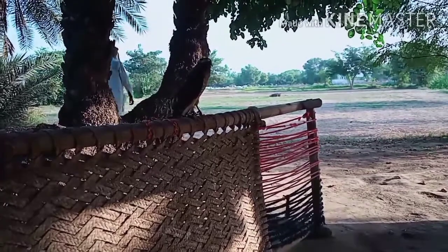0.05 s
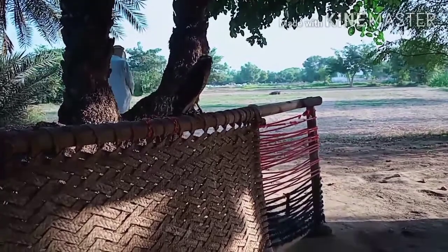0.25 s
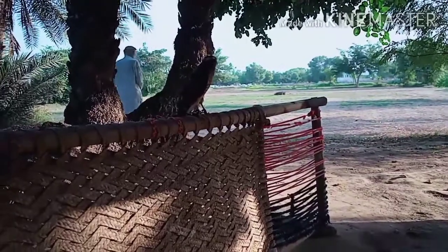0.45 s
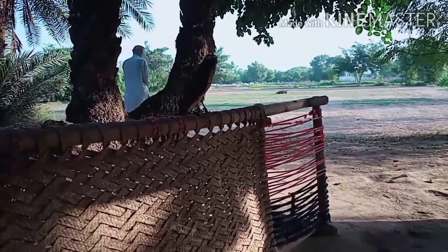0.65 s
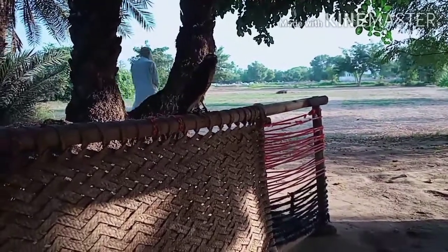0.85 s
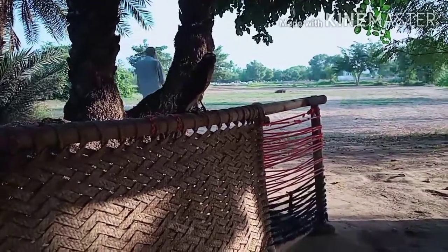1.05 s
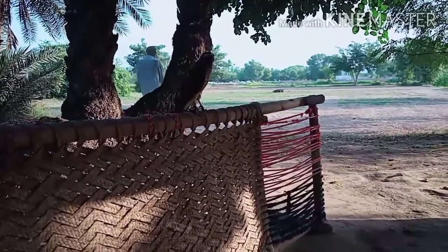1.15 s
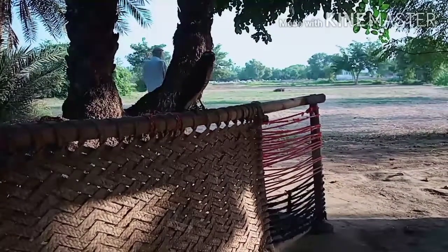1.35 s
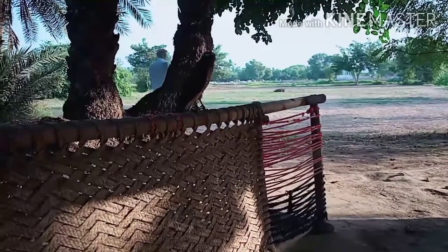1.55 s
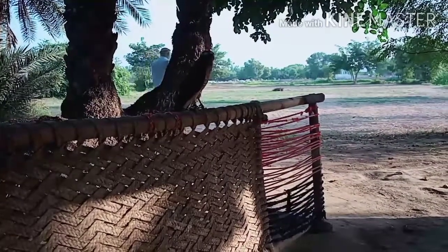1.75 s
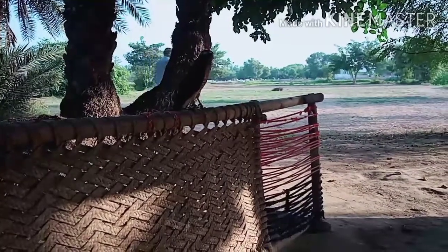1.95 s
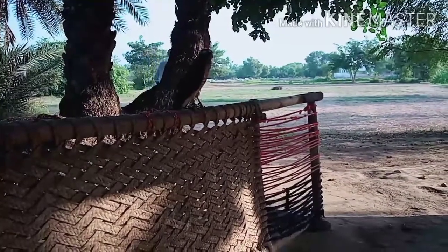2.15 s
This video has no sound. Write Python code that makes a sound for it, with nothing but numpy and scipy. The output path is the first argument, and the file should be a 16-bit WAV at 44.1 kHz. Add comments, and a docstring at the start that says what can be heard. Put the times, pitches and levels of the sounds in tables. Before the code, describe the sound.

One drawn-out bird-of-prey cry rises and falls outdoors, followed by a crisp click and tiny jingles.

```python
"""Hawk calling in a rural yard

A perched hawk gives one long clear wail, a stack of pure tones; trunks and walls echo it, so its overtones beat.
A dry snap rings short tones and leaves a noisy tail; two tiny bells jingle as knocks and rattle ring their metal.
Small birds chirp with gliding tones, and a faint low swell of filtered noise passes.
A far one-cylinder pump thumps with low ringing tones, over coloured noise for hum, leaves and far birds."""
import sys
import numpy as np
from scipy import signal
from scipy.fft import rfft, irfft
from scipy.io import wavfile
from scipy.ndimage import uniform_filter1d

SR = 44100
rng = np.random.default_rng(int(sys.argv[2]) if len(sys.argv) > 2 else 0)


def voltage_ratio(level):
    """Linear amplitude factor for a level in decibels (scalar or array-like)."""
    return 10 ** (np.asarray(level, float) / 20)


def master_out(mix):
    """Clip the mix to full scale and print it as 16-bit PCM to the path in sys.argv[1]."""
    frames = np.transpose(np.atleast_2d(mix))
    ceiling = np.clip(frames, -1, 1)
    pcm = np.round(ceiling * 32767).astype(np.int16)
    wavfile.write(sys.argv[1], SR, pcm)


N = 97020
T = np.arange(N) / SR  # time of each sample [s]


def curve(rows, col, outside=None):
    """A table column joined by straight lines in time; outside is its value before and after."""
    r = np.array(rows, float)
    return np.interp(T, r[:, 0], r[:, col], outside, outside)


def shape(points, hz):
    """Level in dB at hz, by straight lines on a logarithmic frequency axis."""
    p = np.array(points, float)
    return np.interp(np.log(np.maximum(hz, 1)), np.log(p[:, 0]), p[:, 1])


def unit(x):
    """Scale to rms 1."""
    return x / np.sqrt(np.mean(x ** 2))


def decay(t, t60):
    """Exponential fall of 60 dB in t60 seconds."""
    return np.exp(-np.log(1000) * t / t60)


def noise(points):
    """Noise coloured by a table of (frequency, level), rms 1."""
    spectrum = rfft(rng.standard_normal(N))
    hz = np.fft.rfftfreq(N, 1 / SR)
    return unit(irfft(spectrum * voltage_ratio(shape(points, hz)), N))


def band(x, hz, width_hz):
    """Keep a band of frequencies around hz."""
    edges = [max(hz - width_hz / 2, 10), hz + width_hz / 2]
    return signal.sosfilt(signal.butter(2, edges, "band", fs=SR, output="sos"), x)


def walk(rate):
    """Smooth random wander, rms 1; a higher rate [Hz] wanders faster."""
    k = max(int(SR / rate), 1)
    return unit(uniform_filter1d(uniform_filter1d(rng.standard_normal(N), k), k))


def ring(hits, modes, rise_s):
    """Hits set off a sum of decaying tones, as in a struck body; the tones take about rise_s to swell."""
    t = T[:SR // 2]
    body = sum(voltage_ratio(db) * np.sin(2 * np.pi * hz * t) * decay(t, t60) for hz, db, t60 in modes)
    swell = 1 - np.exp(-(t / rise_s) ** 2)
    return signal.fftconvolve(hits, body * swell)[:N]


def blows(rows):
    """One single-sample impulse for each (time, level)."""
    x = np.zeros(N)
    for s, db in rows:
        x[int(s * SR)] += voltage_ratio(db)
    return x


def fade(t0, t1, s):
    """1 between t0 and t1, with ramps of s seconds inside."""
    return np.clip(np.minimum(T - t0, t1 - T) / s, 0, 1)


def hawk():
    """A harmonic tone: the throat boosts or weakens each overtone, and a little air noise joins in."""
    # the wail: (time [s], pitch [Hz], tone level before the throat [dB],
    # tilt above the second harmonic [dB per octave], air noise level [dB])
    wail = [(0.108, 1247, -78, -16, -60), (0.11, 1201, -52.5, -35, -62), (0.138, 1419, -43, -10.5, -48.5),
            (0.186, 1468, -38, -10.5, -53.5), (0.272, 1618, -33.5, -2, -59.5),
            (0.296, 1622, -32.5, -6.5, -49), (0.314, 1641, -34, -1, -51), (0.42, 1635, -31.5, -1, -49),
            (0.532, 1549, -33.5, 0.5, -47.5), (0.604, 1500, -32.5, -1.5, -57), (0.622, 1470, -38, 3, -46),
            (0.684, 1417, -39, 1, -55), (0.726, 1360, -42.5, 4, -47), (0.758, 1333, -45.5, 2, -43),
            (0.786, 1273, -40, -3, -55), (0.8, 1215, -47, 2.5, -39.5), (0.826, 1161, -48.5, -8, -52),
            (0.836, 1128, -60, -4, -62)]
    # how the throat colours the voice: (frequency [Hz], level [dB])
    throat = [(1100, 8), (1650, -0.5), (2350, 14.5), (2800, 10), (3050, 11), (3180, 2), (3280, 19),
              (3700, 16.5), (4200, 13.5), (4600, 1.5), (4950, 3.5), (5600, 3), (6300, 0), (7200, -12),
              (8200, -7), (10000, -12.5), (13000, -21), (15500, -37)]
    waver, waver_hz = .002, 60  # pitch unsteadiness: rms share of the pitch, rate
    pitch = uniform_filter1d(curve(wail, 1), size=900, mode="nearest")
    pitch = pitch * (1 + waver * walk(waver_hz))
    phase = 2 * np.pi * np.cumsum(pitch) / SR
    tone = 0
    for k in range(1, 14):
        tilt_db = curve(wail, 3) * np.log2(max(k / 2, 1))
        gain = voltage_ratio(shape(throat, k * pitch) + tilt_db)
        gain = gain * (k * pitch < .45 * SR)  # leave out tones too high for the sample rate
        tone = tone + np.sqrt(2) * gain * np.sin(k * phase)
    breath = voltage_ratio(curve(wail, 4)) * noise(throat)
    voice = tone * voltage_ratio(curve(wail, 2)) + breath
    return voice * fade(wail[0][0], wail[-1][0], .01)


def snap():
    """A short dry crack of ringing tones, then a noisy tail scattered by leaves, ground and farther trees."""
    # the crack: (time [s], level [dB])
    crack = [(1.3857, -16)]
    # its ringing tones: (frequency [Hz], level [dB], time to fall 60 dB [s])
    crack_modes = [(1594, -20.5, 0.07), (2436, 4.5, 0.0098), (3210, 1, 0.011), (4150, -8.5, 0.014),
                   (5950, -20, .01), (7940, -22, .008)]
    # colour of the tail: (frequency [Hz], relative level per Hz [dB])
    tail_colour = [(760, -52), (1300, -23), (1630, -11), (1840, -28), (1960, -15), (2860, -7.5), (3440, -2),
                   (4770, -15), (7250, -17.5), (15000, -50)]
    near_db, near_t60_s = -19.5, 0.099  # relative to the crack
    far_db, far_t60_s = -26, 0.72  # the slower wash from farther trees
    s, db = crack[0]
    after = np.maximum(T - s, 0)
    fall = voltage_ratio(near_db) * decay(after, near_t60_s) + voltage_ratio(far_db) * decay(after, far_t60_s)
    start = np.clip(after / 0.0022, 0, 1)  # silent before the crack, then a quick rise
    tail = noise(tail_colour) * voltage_ratio(1.5 * walk(300)) * start * fall
    return ring(blows(crack), crack_modes, .00045) + voltage_ratio(db) * tail


def bell(modes, knocks, shake):
    """A bell's metal rings from clear knocks of the pellet inside and from its random rattle."""
    rattle_per_s = 700  # average number of small random hits
    chance, size = rng.random(N), rng.standard_normal(N)
    rattle = (chance < rattle_per_s / SR) * size * voltage_ratio(curve(shake, 1, -120))
    return ring(blows(knocks) + rattle, modes, 0.00058)


def high_bell():
    """The higher bell rings longer, mostly on one tone."""
    # ringing tones: (frequency [Hz], level [dB], time to fall 60 dB [s])
    high_modes = [(3790, 0, .06), (7400, -28, .12), (8320, -27, .08), (12130, -31, .22), (13280, -36, .08)]
    # clear knocks of the pellet: (time [s], level [dB])
    high_knocks = [(1.529, -40), (1.601, -37), (1.623, -39), (1.6588, -23), (1.676, -35), (1.697, -34),
                   (1.713, -39), (1.769, -43)]
    # strength of the rattle: (time [s], level [dB])
    high_shake = [(1.52, -62), (1.55, -52), (1.585, -56), (1.635, -42), (1.655, -46), (1.7, -44),
                  (1.74, -52), (1.82, -62)]
    return bell(high_modes, high_knocks, high_shake)


def low_bell():
    """The lower bell has heavily damped tones, so it clicks more than it rings."""
    # ringing tones: (frequency [Hz], level [dB], time to fall 60 dB [s])
    low_modes = [(3205, 3.5, 0.016), (3020, -11.5, .015), (6750, -5, 0.016), (7080, -11, .02)]
    # clear knocks of the pellet: (time [s], level [dB])
    low_knocks = [(1.520, -38), (1.535, -37), (1.562, -41), (1.577, -35), (1.590, -38)]
    # strength of the rattle: (time [s], level [dB])
    low_shake = [(1.49, -56), (1.535, -47), (1.56, -50), (1.6, -46), (1.68, -56)]
    return bell(low_modes, low_knocks, low_shake)


def chirping():
    """Short sine notes, arched or gliding in pitch, that flicker in level."""
    # arched chirps: (middle [s], length [s], edge pitch [Hz], top pitch [Hz], level [dB])
    arches = [(.401, .028, 5900, 7500, -58), (.939, .03, 3500, 5750, -55), (1.218, .042, 3600, 7400, -58),
              (1.249, .016, 3600, 5700, -62)]
    # straight glides: (start [s], length [s], start pitch [Hz], end pitch [Hz], level [dB])
    glides = [(.895, .025, 4000, 7000, -65), (.948, .014, 8200, 5500, -65), (.958, .03, 2950, 2550, -58),
              (1.012, .03, 4200, 3700, -60), (1.018, .03, 5750, 5200, -61), (1.145, .028, 3800, 6800, -65),
              (1.152, .03, 2600, 6600, -63), (1.165, .037, 2800, 8300, -64), (1.18, .045, 2200, 6200, -63),
              (1.252, .016, 8200, 6200, -65), (1.265, .035, 3300, 2500, -59)]
    arch_power = 3.2  # higher stays near the top pitch for longer
    flicker_db, flicker_hz = 4.5, 220  # rms, rate
    notes = []
    for middle, length, edge, top, db in arches:
        from_middle = np.clip(np.abs(T - middle) * 2 / length, 0, 1)
        pitch = top - (top - edge) * from_middle ** arch_power
        notes.append((middle - length / 2, length, pitch, db))
    for s, length, first, last, db in glides:
        notes.append((s, length, np.interp(T, [s, s + length], [first, last]), db))
    out = 0
    for s, length, pitch, db in notes:
        loudness = voltage_ratio(db + flicker_db * walk(flicker_hz)) * fade(s, s + length, 0.0014)
        out = out + loudness * np.sqrt(2) * np.sin(2 * np.pi * np.cumsum(pitch) / SR)
    return out


def far_twitter():
    """A far twitter: a sine blurred by fast random changes of pitch and level."""
    # (time [s], centre pitch [Hz], level [dB])
    twitter = [(1.8, 2790, -99), (1.838, 2825, -55.5), (2.002, 2864, -55), (2.05, 2900, -106),
               (2.06, 2770, -75)]
    pitch = curve(twitter, 1) * (1 + 0.05 * walk(120.1))
    phase = 2 * np.pi * np.cumsum(pitch) / SR
    return np.sin(phase) * voltage_ratio(curve(twitter, 2, -120) + 5.4 * walk(60))


def low_swell():
    """A faint swell of random noise in three low bands."""
    # strength of the swell: (time [s], level [dB])
    swell_level = [(0.56, -71), (0.656, -50.5), (0.714, -53), (0.75, -50), (0.844, -50), (1.06, -83)]
    # noise bands: (centre [Hz], width [Hz], relative level [dB])
    swell_bands = [(535, 150, -8.5), (1275, 284, 4), (2120, 540, -4.5)]
    rush = sum(voltage_ratio(db) * unit(band(rng.standard_normal(N), hz, w)) for hz, w, db in swell_bands)
    return rush * voltage_ratio(curve(swell_level, 1, -120))


def pump():
    """Each firing thumps the exhaust, which rings at low tones, never quite alike; valves clatter."""
    # exhaust tones: (frequency [Hz], relative level [dB], time to fall 60 dB [s])
    exhaust_modes = [(70, -7, .09), (104.6, 24, 0.13), (129, -13.5, 0.055), (200, -5.5, 0.14),
                     (255, -24, .04)]
    firing_hz, first_s = 9.645, .084
    scatter_db = 1.3  # rms difference in strength between firings
    thump_db, clatter_db = -55, -60.5  # thump: overall rms; clatter: rms at each firing
    since = ((T - first_s) * firing_hz % 1) / firing_hz  # time since the last firing [s]
    firing = np.diff(since, prepend=1) < 0
    firing[0] = False
    push = firing * voltage_ratio(scatter_db * rng.standard_normal(N))
    puff = 0.004 * np.exp(-since / 0.065) * rng.standard_normal(N)
    thump = unit(ring(push + puff, exhaust_modes, 0.0082))
    clatter = unit(band(rng.standard_normal(N), 1790, 2120)) * np.exp(-since / .09)
    return voltage_ratio(thump_db) * thump + voltage_ratio(clatter_db) * clatter


def air():
    """Coloured noise for distant hum, leaves and far birds; each octave wanders a little on its own."""
    # (frequency [Hz], relative level per Hz [dB])
    air_colour = [(24, -32), (40, -1), (114, -1.5), (222, -7.5), (394, -16.5), (481, -15.5), (648, -19.5),
                  (698, -19.5), (771, -24), (1240, -16), (1440, -18.5), (2090, -15), (2740, -11.5),
                  (3790, -11), (4980, -35), (7230, -20), (8190, -36.5), (11600, -34.5), (15200, -51)]
    air_db = -52.5  # rms before the wander
    spectrum = rfft(noise(air_colour))
    octave = np.log2(np.maximum(np.fft.rfftfreq(N, 1 / SR), 1) / 30)  # octaves above 30 Hz
    out = 0
    for k in range(11):
        part = irfft(spectrum * np.clip(1 - np.abs(octave - k), 0, 1), N)
        out = out + part * voltage_ratio(0.23 * walk(3.1) + 1.66 * walk(17))  # slow and faster wander
    return voltage_ratio(air_db) * out


def yard(x, wet_db):
    """Adds a few strong reflections and a diffuse tail that loses its treble first."""
    # strong single reflections: (delay [s], relative level [dB])
    reflections = [(.0042, -11.5), (.011, -3.5), (.019, -20.5), (.031, -7.5)]
    # small trunks scatter the treble best: (frequency [Hz], level [dB])
    echo_colour = [(300, -9.5), (1600, -13.5), (2600, -6), (5000, 0), (12000, 4.5)]
    tail_db = -1  # diffuse tail, before wet_db and the colour
    low_t60_s, treble_t60_s = .36, .24
    t = T[:SR // 2]
    low, high = rng.standard_normal((2, len(t)))
    low = uniform_filter1d(low, size=6)
    high = high - uniform_filter1d(high, size=6)
    tail = unit(low) * decay(t, low_t60_s) + unit(high) * decay(t, treble_t60_s)
    tail = tail / np.sqrt(np.sum(tail ** 2))
    echo = voltage_ratio(wet_db) * (voltage_ratio(tail_db) * tail + blows(reflections)[:len(t)])
    colour = voltage_ratio(shape(echo_colour, np.fft.rfftfreq(len(t), 1 / SR)))
    echo = irfft(rfft(echo) * colour, len(t))
    wet = signal.fftconvolve(x, echo)[:N]
    return (x + wet) / np.sqrt(1 + np.sum(echo ** 2))  # keeps the total power about the same


def scene():
    """All sources together; hawk, small birds and bells echo in the yard."""
    call = yard(hawk(), -2.5)
    birds = yard(chirping() + far_twitter(), -7)
    bells = yard(high_bell() + low_bell(), -8)
    return (call + birds + bells + snap() + low_swell() + pump() + air())[None]


def top_cut(x):
    """Nothing passes above the cut-off."""
    return signal.sosfilt(signal.butter(12, 15400, fs=SR, output="sos"), x)


def record(dry):
    """A phone microphone thins the deep bass, here with a high-pass filter at 62 Hz."""
    mix = signal.sosfilt(signal.butter(3, 62, "high", fs=SR, output="sos"), dry)
    return top_cut(mix)


dry = scene()
out = record(dry)
master_out(out)
```